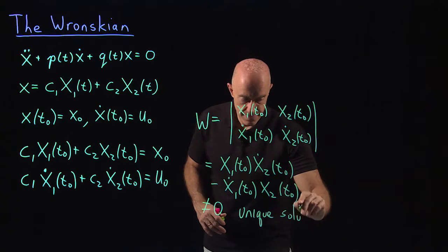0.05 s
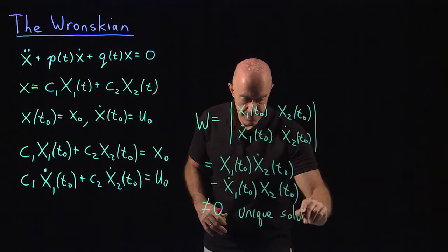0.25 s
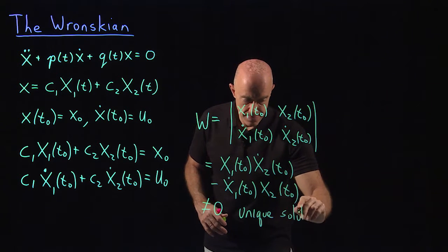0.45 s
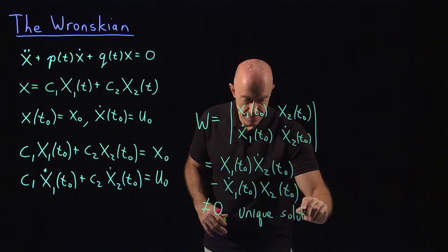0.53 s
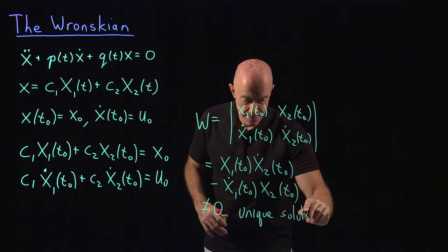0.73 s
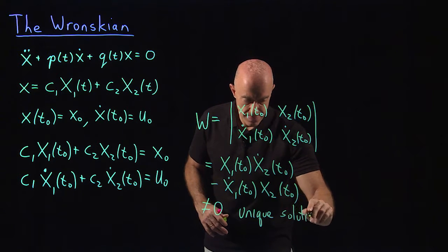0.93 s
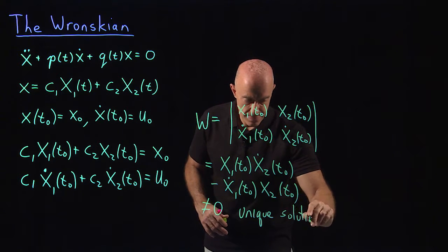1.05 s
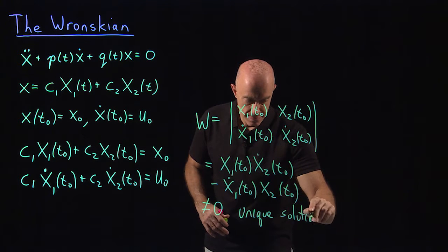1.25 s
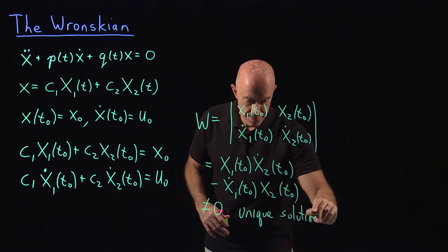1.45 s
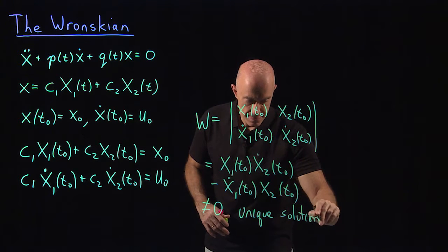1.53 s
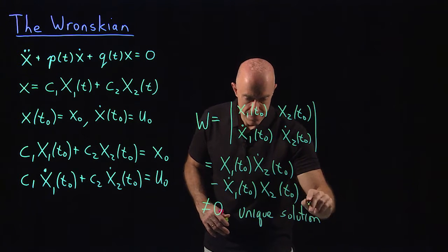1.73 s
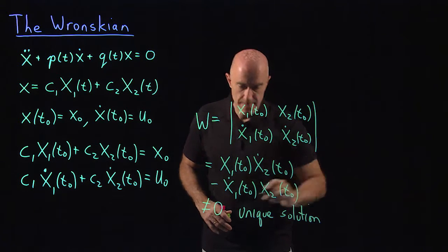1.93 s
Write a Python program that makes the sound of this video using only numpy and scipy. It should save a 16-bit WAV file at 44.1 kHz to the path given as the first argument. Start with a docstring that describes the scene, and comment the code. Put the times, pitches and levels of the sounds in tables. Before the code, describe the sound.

A felt-tip marker writes on a large glass board in a quiet, fairly dry room. A faint rub opens, then a soft thud at 0.2 s and a very high, thin squeak at 0.25 s, under a tenth of a second long. Dull taps near 0.5, 0.75 and 1.0 s alternate with faint hissing strokes, some chirping weakly until 1.6 s. A stronger, brighter thud lands at 1.8 s, a muffled one at 1.94 s. Faint air and hiss.

```python
"""A felt-tip marker on a large glass board in a quiet, fairly dry room, over faint air and microphone hiss.
A short rub of coloured noise opens; a soft thud follows, the pane pushed and left ringing in damped sines.
Two strokes hiss in quick succession; a stick-slip squeal, a near-pure gliding sine, cuts through,
with brief lower chirps near its start and end. Then come thuds and hissing strokes, three with a low chirp.
Two last landings close the scene, the first of them the strongest and brightest thud."""
import sys
import numpy as np
from scipy import signal
from scipy.fft import rfft, irfft
from scipy.io import wavfile

SR = 44100
rng = np.random.default_rng(int(sys.argv[2]) if len(sys.argv) > 2 else 0)


def store_wav(level_fs):
    """Save 16-bit WAV to argv[1]."""
    pcm = np.round(np.clip(np.atleast_2d(level_fs), -1, 1) * 32767)
    wavfile.write(sys.argv[1], SR, pcm.T.astype(np.int16))


N = 88200
TIME = np.arange(N) / SR


def amp(db):
    """Decibels to gain."""
    return 10 ** (np.asarray(db) / 20)


def unit(x):
    """Scales to rms 1."""
    return x / np.sqrt(np.mean(x ** 2) + 1e-20)


def read(points, hz):
    """Reads a table on a log-frequency axis."""
    f, value = np.transpose(points)
    return np.interp(np.log(hz + 1), np.log(f + 1), value)


def noise(spectrum):
    """White noise coloured by a spectrum table, rms 1."""
    gain = amp(read(spectrum, np.fft.rfftfreq(N, 1 / SR)))
    return unit(irfft(rfft(rng.standard_normal(N)) * gain, N))


def wander(hz):
    """Random drift, rms 1, mostly slower than the given rate."""
    gain = 1 / (1 + (np.fft.rfftfreq(N, 1 / SR) / hz) ** 2) ** 2
    return unit(irfft(rfft(rng.standard_normal(N)) * gain, N))


def progress(start, length):
    """How far a movement has come, from 0 to 1."""
    return np.clip((TIME - start) / length, 0, 1)


def arch(start, length, skew=1):
    """Swell and fall of one movement; skew over 1 puts the top late."""
    return np.abs(np.sin(np.pi * progress(start, length) ** skew))


# colour of the ventilation noise: f/Hz, relative level per Hz/dB
AIR_SPECTRUM = [(20, -31), (50, 1.5), (80, 0.5), (103, 14.5), (135, 7.5), (220, 4), (400, 0), (700, -1),
                (1500, -17.5), (5000, -26)]
AIR_DB, HISS_DB = -76.5, -64  # rms levels


def background():
    """Low ventilation noise and even microphone hiss."""
    hiss = noise([(20, 0.28), (3000, -0.14), (15000, -.5)])  # f/Hz, relative level per Hz/dB
    return amp(AIR_DB) * noise(AIR_SPECTRUM) + amp(HISS_DB) * hiss


# decay of the room's tail: f/Hz, time to fall 60 dB/s
ROOM_DECAY = [(100, 0.37), (400, 0.58), (3000, 0.26), (10000, 0.3)]
WALL_S, ROOM_BUILD_S = .041, 0.011  # delay of one distinct reflection, time the tail takes to fill


def room(x, wet_db, wall_db):
    """Adds one wall reflection and a diffuse tail whose decay depends on frequency."""
    size = SR // 2
    hz, t, z = signal.stft(rng.standard_normal(size), SR, nperseg=256)
    decay = np.exp(-np.log(1000) * t / read(ROOM_DECAY, hz)[:, None])
    tail = signal.istft(z * decay, SR)[1][:size]
    tail *= np.minimum(TIME[:size] / ROOM_BUILD_S, 1) ** 2
    echo = amp(wet_db) * tail / np.linalg.norm(tail)
    echo[int(WALL_S * SR)] += amp(wall_db)
    return x + signal.fftconvolve(x, echo)[:N]


PUSH_WIDTH_S = 0.00076


def push(t):
    """One soft to-and-fro of the glass, centred on t = 0."""
    u = (t / PUSH_WIDTH_S) ** 2
    return (1 - u) * np.exp(-u / 2)


# modes of the glass pane: f/Hz, level relative to the landing/dB, time to fall 60 dB/s
PANE_MODES = [(108, -25, 0.25), (205.7, -19.5, 0.056), (280, -25, 0.17), (354.4, -24, 0.51),
              (383, -20, 0.15), (472, -26, 0.33), (550, -21.5, 0.062), (880, -19.5, 0.026),
              (1135, -22.5, 0.044), (1510, -22, .05)]
RING_DELAY_S = 0.00424  # the ring starts this long after the middle of the push


def pane_ring(t):
    """The pane's modes ring as sines that die away, each at its own rate."""
    age = np.maximum(t - RING_DELAY_S, 0)
    return sum(amp(db) * np.exp(-np.log(1000) * age / t60) * np.sin(2 * np.pi * hz * age)
               for hz, db, t60 in PANE_MODES)


# the tip lands on the glass: t/s, level/dB, low-pass corner (brightness of the blow) f/Hz
LANDINGS = [(0.1902, -62, 416), (.525, -48.5, 550), (.757, -52, 200), (1.015, -57, 130),
            (1.8055, -39, 1490), (1.937, -51, 119)]
PUSH_S, PUSH_DB = 0.00228, -2  # delay from landing to the middle of the push, push level
EDGE_ECHO_S, EDGE_ECHO_DB = 0.00695, -11
LOW_CUT_HZ = 54  # the pane radiates little below this


def taps():
    """Each landing pushes the pane; the wave returns from its edge and the pane rings."""
    out = np.zeros(N)
    for s, db, bright_hz in LANDINGS:
        t = TIME - s - PUSH_S
        direct = amp(PUSH_DB) * push(t)
        edge_echo = -amp(EDGE_ECHO_DB) * push(t - EDGE_ECHO_S)  # comes back inverted
        thud = direct + edge_echo + pane_ring(t)
        out += amp(db) * signal.lfilter(*signal.butter(2, bright_hz, fs=SR), thud)
    return signal.lfilter(*signal.butter(1, LOW_CUT_HZ, "high", fs=SR), out)


# strokes of the felt on the glass: start t/s, length t/s, level at the top of the swell/dB
FELT_STROKES = [(0., 0.045, -71), (0.234, 0.019, -52.5), (0.264, 0.065, -57.5), (0.557, .06, -67.5),
                (0.792, 0.068, -66), (1.07, 0.055, -73), (1.347, 0.057, -65), (1.58, 0.046, -62)]
# colour of the rubbing: f/Hz, relative level per Hz/dB
FELT_SPECTRUM = [(1000, -30), (2400, -19), (3300, -2), (4200, -19), (5500, -5.5), (7300, -1.5), (9400, 1.5),
                 (11000, -7.5), (15500, -22)]
STROKE_SKEW, GRAIN_DB = 2.1, 3  # late swell, rms depth of the grain


def rubbing():
    """Grainy hiss of felt, swelling with each stroke."""
    swell = sum(amp(db) * arch(s, length, STROKE_SKEW) for s, length, db in FELT_STROKES)
    grain = amp(GRAIN_DB * wander(hz=590))
    return swell * unit(noise(FELT_SPECTRUM) * grain)


JITTER, SHIMMER_DB = 0.00085, .5  # rms unsteadiness of pitch (share) and of level
FLUTTER_HZ = 503  # rate scale of both


def tone(hz):
    """The tip sticks and slips at a slightly unsteady rate, heard as a sine."""
    turns = np.cumsum(hz * (1 + JITTER * wander(FLUTTER_HZ))) / SR
    shimmer = amp(SHIMMER_DB * wander(FLUTTER_HZ))
    return np.sqrt(2) * np.sin(2 * np.pi * turns) * shimmer


# lower chirps: start t/s, length t/s, middle pitch f/Hz, level at the top/dB, whole fall in pitch/share
LOW_CHIRPS = [(0.243, 0.0089, 3250, -57, 0.025), (0.3248, .019, 3185, -51.5, .025),
              (0.848, .05, 1544, -79, .01), (1.386, 0.047, 1528, -69, 0.0553),
              (1.623, 0.035, 1500, -65.5, .03)]


def chirps():
    """The tip catches briefly at a lower, sagging stick-slip pitch."""
    out = np.zeros(N)
    for s, length, hz, db, sag in LOW_CHIRPS:
        pitch = hz * (1 - sag * (progress(s, length) - .5))
        out += amp(db) * arch(s, length) * tone(pitch)
    return out


# glide of the stick-slip squeal: t/s, pitch f/Hz, level/dB
SQUEAL_GLIDE = [(0.242, 8000, -55), (0.2471, 8550, -47.5), (0.2488, 8920, -31.5), (.254, 9200, -32),
                (.262, 9376, -30.5), (.276, 9610, -35.5), (.289, 9640, -34.5), (0.2914, 9720, -38),
                (0.294, 9800, -38.5), (.309, 9720, -37), (.318, 9520, -35.5), (0.326, 9330, -41),
                (0.328, 9100, -54)]


def squeal():
    """A near-pure stick-slip tone that glides up and back down while its level shifts."""
    s, hz, db = np.transpose(SQUEAL_GLIDE)
    sounding = (TIME > s[0]) * (TIME < s[-1])
    return tone(np.interp(TIME, s, hz)) * amp(np.interp(TIME, s, db)) * sounding


def scene():
    """Marker and glass in the room, heard by one microphone on both channels."""
    mono = background()
    mono += room(taps(), wet_db=-9.5, wall_db=-18.5)
    mono += room(rubbing() + chirps(), wet_db=-15, wall_db=-19.5)
    mono += room(squeal(), wet_db=-20, wall_db=-44)
    return np.array([mono, mono])


EDGE_HZ = 15750  # top of the recorder's band


def record(dry):
    """The recorder's band limit, a steep low-pass."""
    low_pass = signal.firwin(511, EDGE_HZ, window=("kaiser", 9), fs=SR)
    return signal.oaconvolve(dry, low_pass[None], "same", axes=1)


dry = scene()
out = record(dry)
store_wav(out)
```